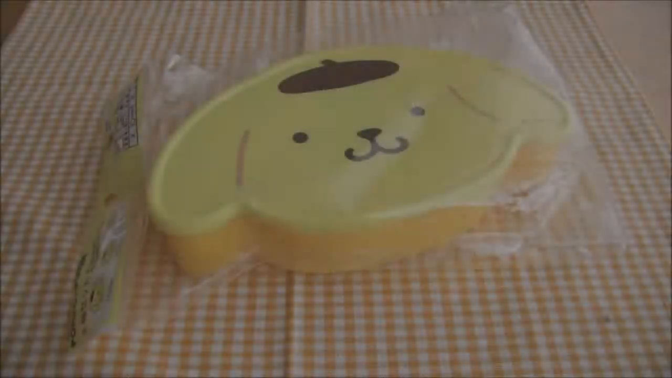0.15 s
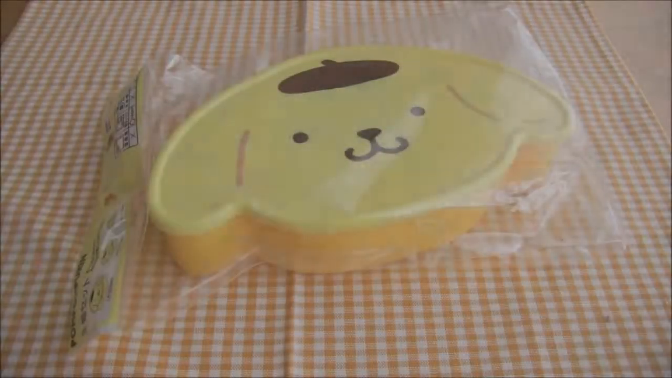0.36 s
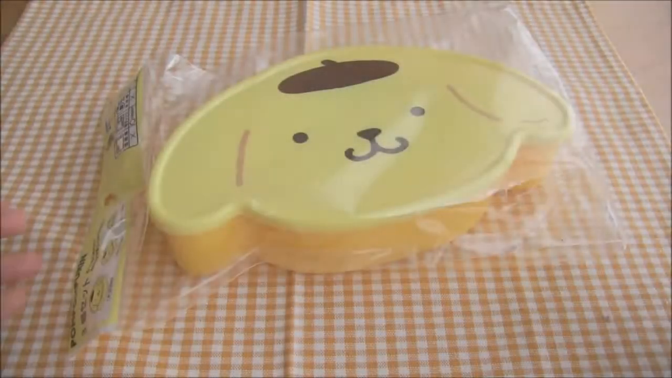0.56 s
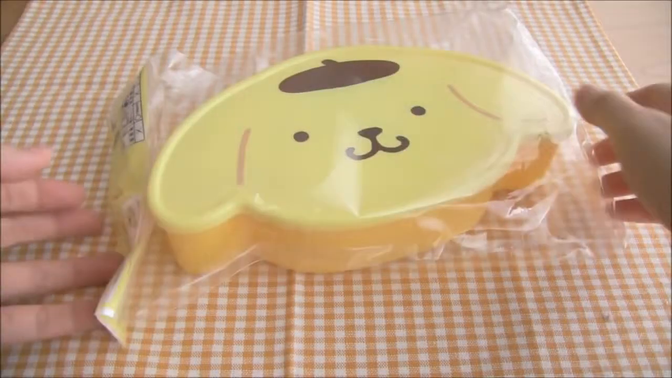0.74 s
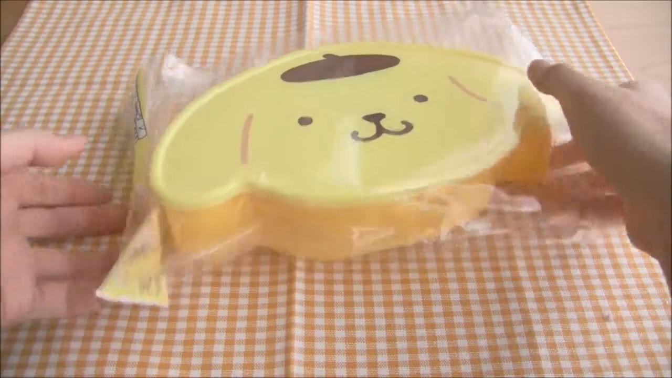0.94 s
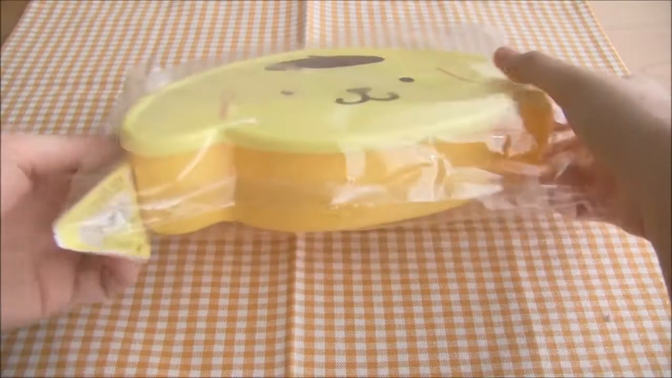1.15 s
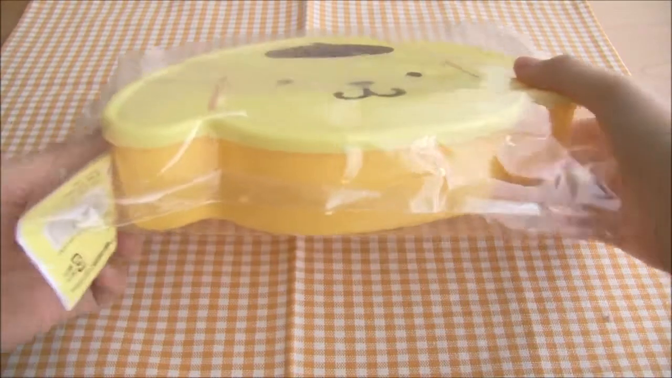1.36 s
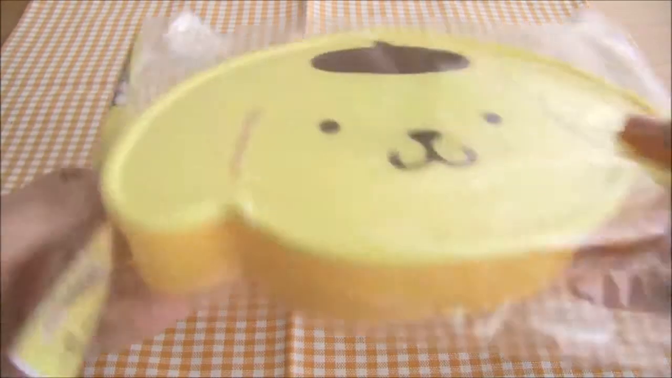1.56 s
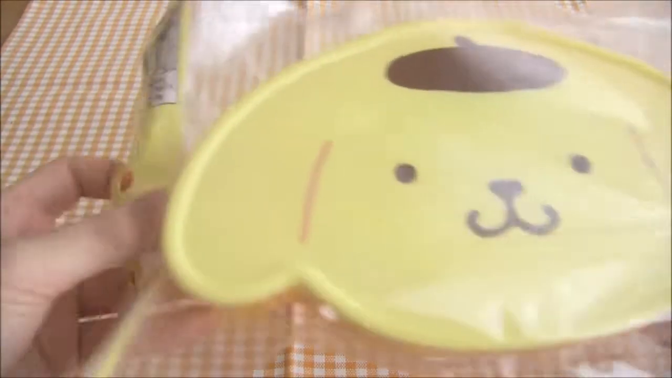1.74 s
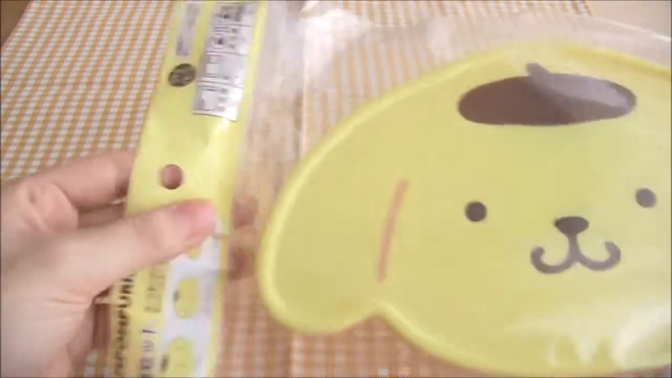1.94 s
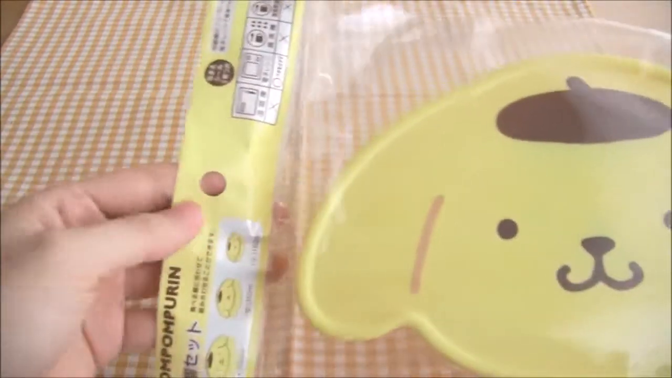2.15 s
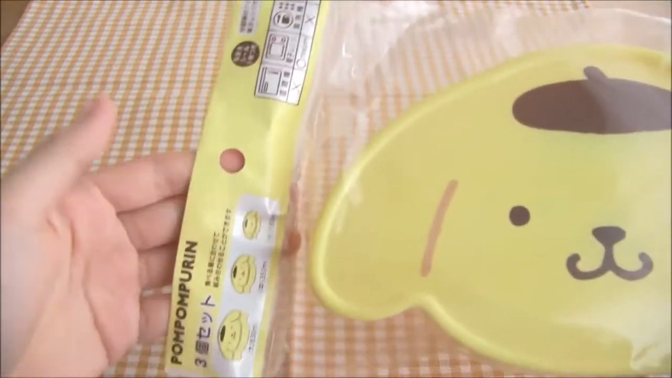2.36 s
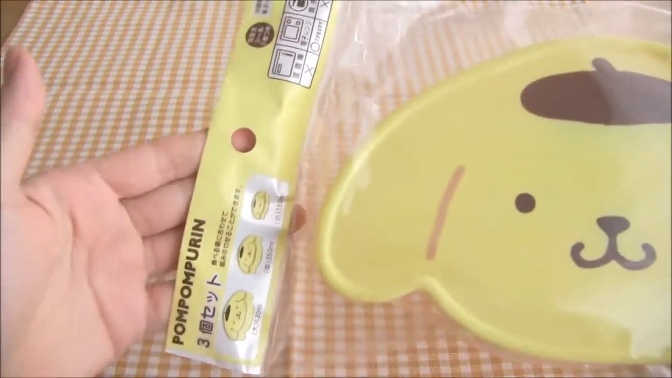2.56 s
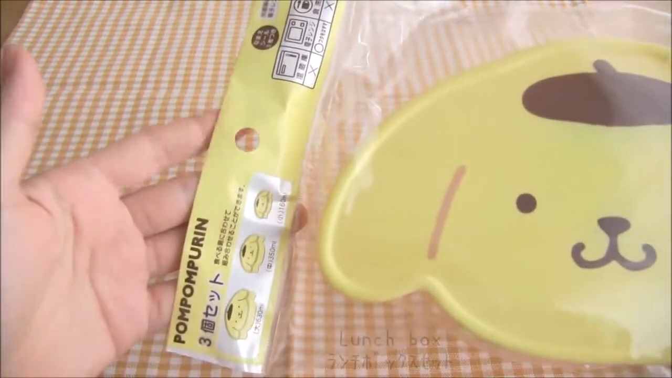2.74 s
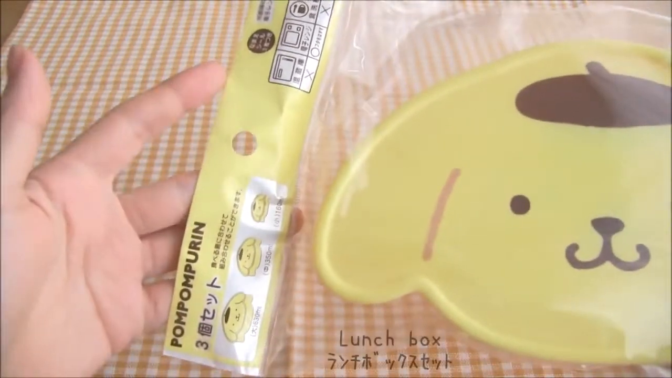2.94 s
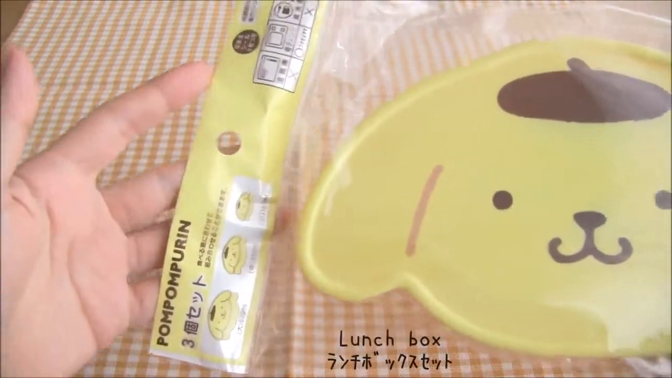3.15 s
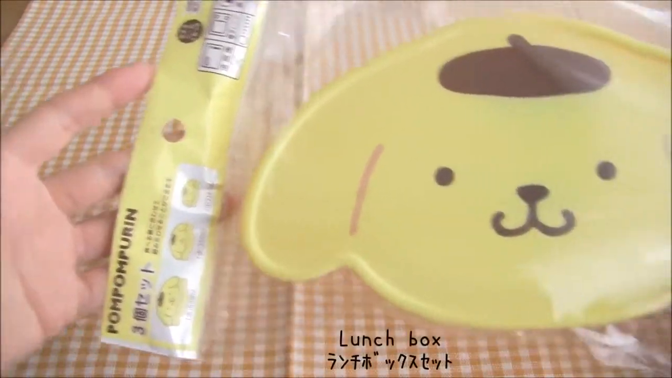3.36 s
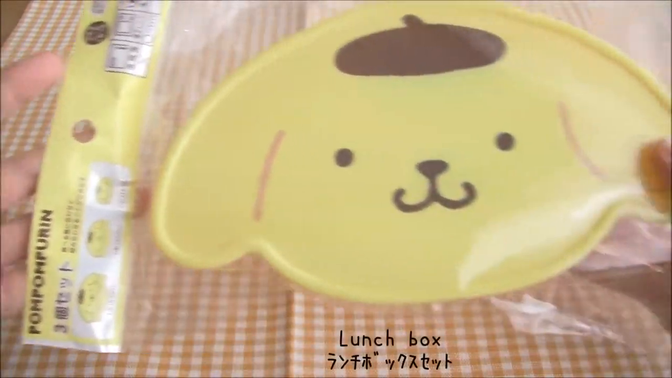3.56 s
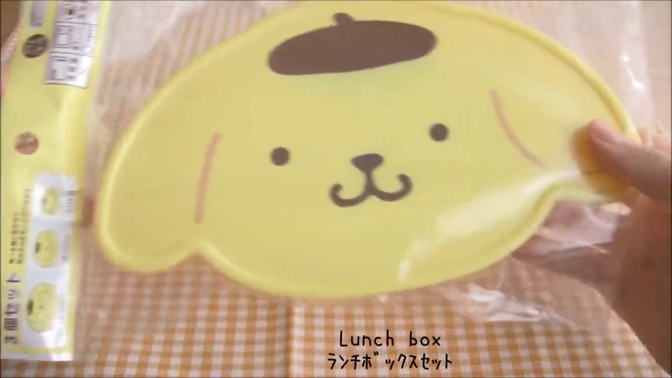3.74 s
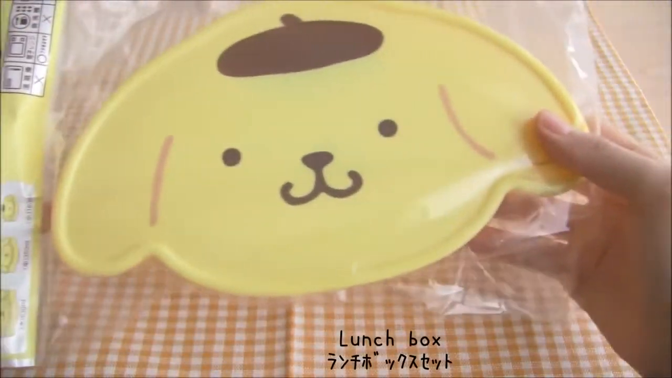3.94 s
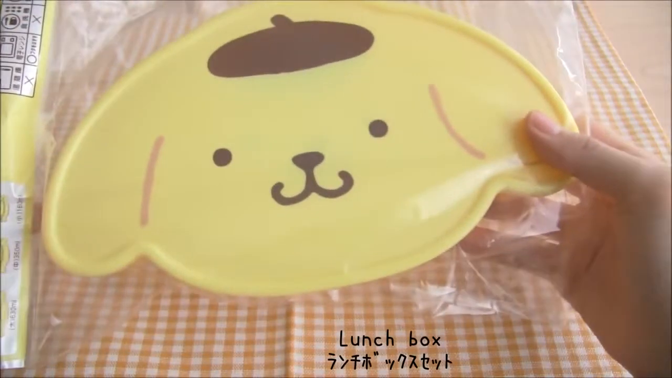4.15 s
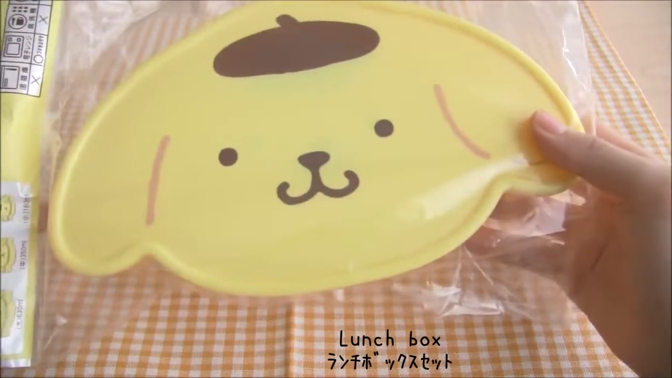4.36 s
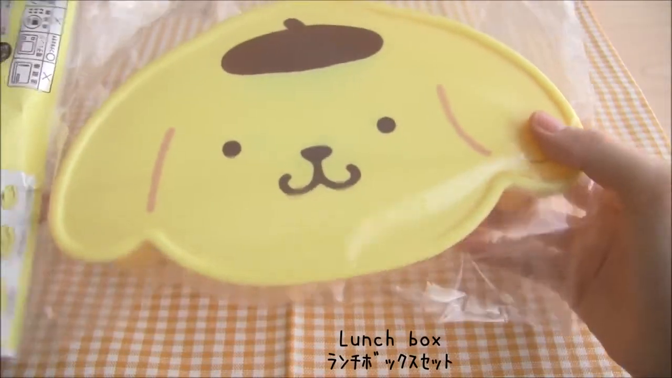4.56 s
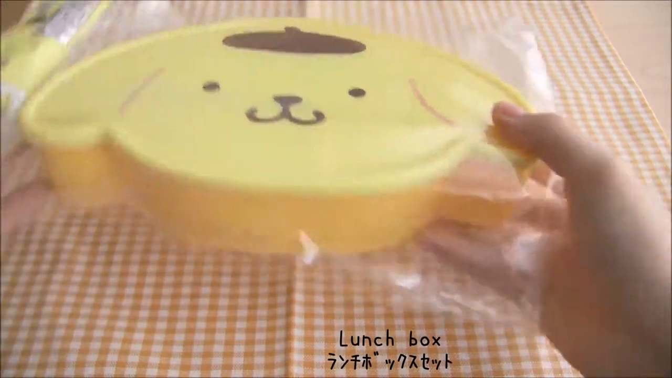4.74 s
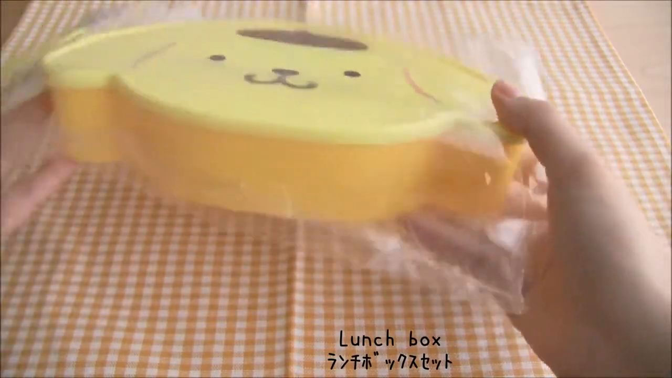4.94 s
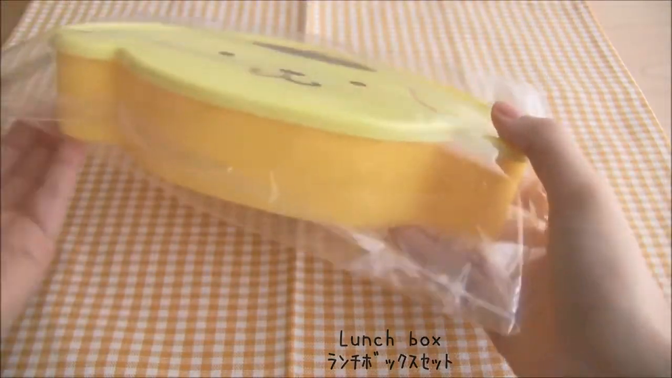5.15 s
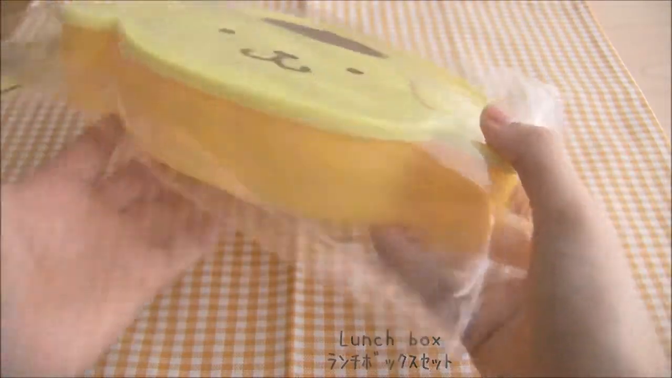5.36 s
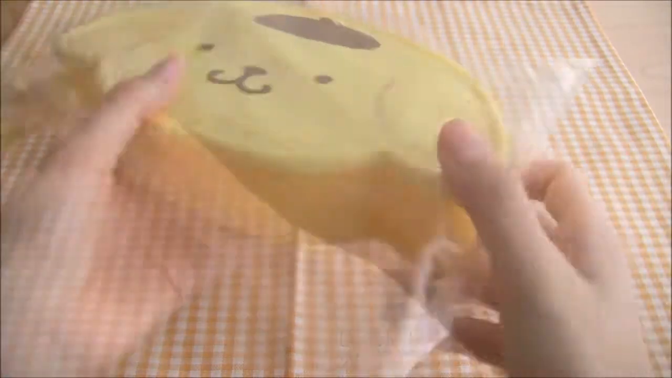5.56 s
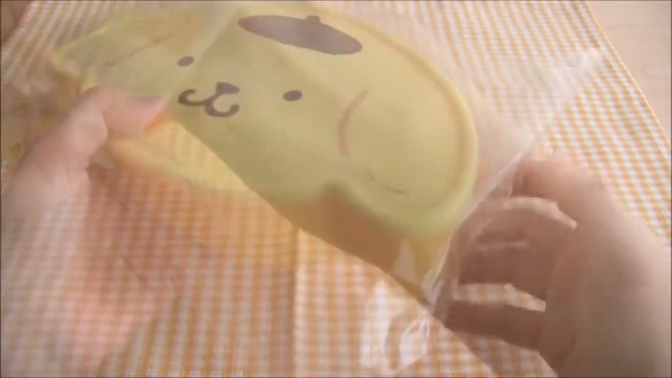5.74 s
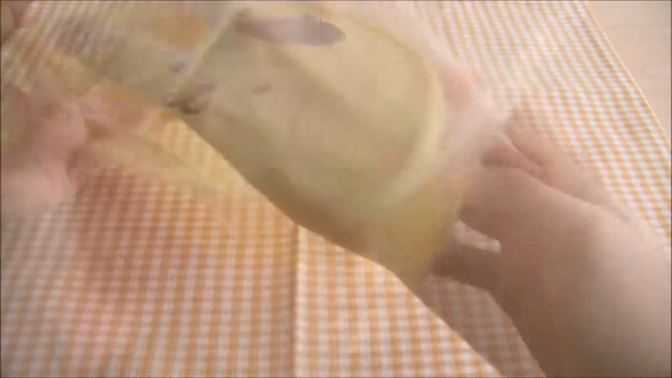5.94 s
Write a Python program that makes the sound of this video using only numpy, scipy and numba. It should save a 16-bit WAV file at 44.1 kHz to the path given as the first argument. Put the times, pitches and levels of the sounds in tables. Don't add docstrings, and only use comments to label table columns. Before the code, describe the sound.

A small quiet room is heard close up in stereo, with low house hum and soft microphone hiss underneath. Apart from one faint tick near 0.6 s, nothing happens until about 0.75 s, when hands close on a stiff clear bag holding a hollow plastic box. Crisp, bright film snaps crowd together with finer crackle as it is lifted and turned, staying busy until about 2.1 s. Dull hollow thuds come around 1.65 and 2.0 s, with strong snaps as the label strip folds. Crinkling thins and stops by 2.4 s. The hold is nearly silent, with tiny ticks near 2.65, 3.15, 3.3 and 3.8 s and a sharp click at 4.44 s. From 4.7 s the film crackles again as the box tips back, with a soft knock near 4.85 s, a lull around 5.2 s, then uneven bursts as it rolls over until 6 s. Reflections are short and shift slightly left and right.

```python
import sys
import numpy as np
from scipy import signal
from scipy.fft import rfft, irfft
from scipy.io import wavfile
from numba import njit

SR = 44100
rng = np.random.default_rng(int(sys.argv[2]) if len(sys.argv) > 2 else 0)


def boost(x):
    u = np.asarray(x, float) / 20
    return 10 ** u


def to_wav(sig):
    pcm = np.clip(np.atleast_2d(sig), -1, 1) * 32767
    pcm = np.round(pcm).astype(np.int16)
    wavfile.write(sys.argv[1], SR, pcm.T)


N = 264600

# (time [s], wide patch level
# [dB], wide patch pitch [Hz], crease level [dB], crease pitch [Hz])
STILL_TICKS = [(0.587, -39, 840, -51, 5580), (2.503, -44.5, 770, -58, 4620), (2.6364, -34, 1460, -44, 2540),
               (2.6455, -36, 1000, -33, 1600), (2.6993, -31, 890, -30.5, 6550),
               (3.1333, -35.5, 765, -39, 2190), (3.144, -34.5, 2230, -41, 4260),
               (3.187, -44, 736, -56, 6010), (3.3335, -31, 1400, -30, 2000), (3.823, -31.5, 880, -28, 2160),
               (4.4414, -16.5, 1840, -25, 6450), (4.4421, -29, 1000, -29, 3700),
               (4.648, -48, 870, -53, 5110)]


@njit
def rings(start, hz, cycles, size, rise):
    out = np.zeros((2, N + 8192))
    for k in range(len(hz)):
        turn = np.exp((2j * np.pi - np.log(1000) / cycles[k]) * hz[k] / SR)
        shrink = np.exp(-hz[k] / SR / rise)
        for ear in range(2):
            at = int(start[ear, k])
            z = size[ear, k] * turn ** (at + 1 - start[ear, k])
            gap = 1.
            for i in range(min(int(cycles[k] * SR / hz[k]), 8000)):
                gap *= shrink
                out[ear, at + 1 + i] += z.imag * (1 - gap)
                z *= turn
    return out[:, :N]


def struck(s, db, hz, cycles, spread_db=0., rise=0.23):
    # (time [s], left minus right [dB])
    hand_path = [(.7, 1), (1.1, 0), (1.6, -1.5), (2.0, 2.5), (2.3, -2.5), (3, 3), (3.8, -4), (4.5, -5.5),
                 (4.9, 4.5), (5.2, -0.5), (5.5, 1.5), (6, 3)]
    lag_s_per_db = 1.2e-6
    side_db = np.array([[.5], [-.5]]) * (np.interp(s, *np.transpose(hand_path)) + spread_db)
    pan = boost(side_db) / np.sqrt(np.mean(boost(side_db) ** 2, axis=0))
    start = np.clip((s - side_db * lag_s_per_db) * SR, 0, N - 1)
    cycles = np.maximum(cycles + 0 * s, 1)
    return rings(start, np.clip(hz, 60, SR / 2.4), cycles, boost(db) * pan, rise)


def shaped(x, hz, db):
    f = np.maximum(np.arange(x.shape[-1] // 2 + 1) * SR / x.shape[-1], 1)
    return irfft(rfft(x) * boost(np.interp(np.log(f), np.log(hz), db)), x.shape[-1])


def unit(x):
    return x / np.sqrt(np.mean(x ** 2))


def background():
    # (time [s], gain [dB])
    gain_curve = [(0, 0.5), (.7, -1), (1.5, -10.5), (2.5, -9), (3.2, -7.5), (3.6, -8.5), (4.6, -6.5),
                  (5.3, -11), (6, -4.5)]
    # (pitch [Hz], width [Hz], level [dB])
    hum_bands = [(47.3, 9, -2.5), (144, 4.8, 2), (193.4, 5.7, 1.5), (245.3, 6.2, -3), (336.2, 6.5, -5.5),
                 (305, 156, -11.5)]
    # (frequency [Hz], level per Hz [dB])
    hiss_colour = [(300, -2), (500, 1), (900, -5), (1500, -7.5), (3000, -14), (4000, -16.5), (5200, -15),
                   (6500, -22), (10000, -27.5), (14000, -27), (15500, -28), (16300, -44)]
    hum_db, hiss_db, rumble_db = -50, -54, -61.5
    t = np.arange(N) / SR
    f = np.geomspace(10, 20000, 600)
    power = 0
    for hz, width, db in hum_bands:
        resonance = boost(db) ** 2 / (1 + (2 * (f - hz) / width) ** 2)
        power = power + resonance / (1 + (f / hz / 1.06) ** 4)
    noise = rng.standard_normal((6, N))
    hum = shaped(noise[0] + 0.53 * noise[1:3], f, 10 * np.log10(power / (1 + (70 / f) ** 4)))
    alike = shaped(noise[3], [1500, 8000], [-8, 3])
    hiss = shaped(alike + noise[4:], *np.transpose(hiss_colour))
    rumble = shaped(noise[0] + 0.19 * noise[4:], [15, 35, 88, 220], [-4, 18.5, 0.5, -45])
    gain = boost(np.interp(t, *np.transpose(gain_curve)))
    steady = unit(hum) * boost(hum_db) + unit(hiss) * boost(hiss_db)
    return unit(rumble) * boost(rumble_db) + gain * steady


def room(dry):
    # (frequency [Hz], level [dB])
    tail_colour = [(200, 5.5), (600, -2), (1300, 2), (2000, 7), (3200, 10.5), (6000, 7), (12000, 7)]
    tail_t60 = [0.56, 0.73, 0.39, 0.37, 0.22, 0.31, 0.22]
    # (delay [s], level [dB])
    flat_echoes = [
        (.0075, -16),
        (0.0169, -21.5),
        (0.0236, -26),
    ]
    room_db, table_db = -8.5, -23
    wall_s, table_s = .0073, .0011
    t = np.arange(SR // 2) / SR
    centres = np.array(tail_colour)[:, 0]
    noise = rng.standard_normal((3, len(t)))
    noise = noise[0] + 0.24 * noise[1:]
    chance = rng.random(len(t) // 24 + 1).repeat(24)[:len(t)]
    noise *= np.where(chance < .2 + t / .05, 1, .3)
    octave = np.log2(np.arange(1, len(t) // 2 + 2) * SR / len(t))
    spectrum = rfft(noise)
    tail = 0
    for (hz, db), t60 in zip(tail_colour, tail_t60):
        band = irfft(spectrum * np.interp(octave, np.log2(centres), centres == hz), len(t))
        tail = tail + boost(db - 60 * t / t60) * band
    tail = tail * np.clip((t - wall_s) / 0.00049, .08, 1)
    tail *= 1 + .9 * np.exp(-t / .018) * (t > wall_s)
    tail *= boost(room_db) / np.sqrt(np.sum(tail ** 2) / 2)
    tail[:, 0] = 1
    tail[:, int(table_s * SR)] += boost(table_db)
    for late, db in flat_echoes:
        tail[:, int(late * SR)] += boost(db)
    return signal.fftconvolve(dry, tail, axes=1)[:, :N]


def box():
    # (time [s], peak level
    # [dB], pitch [Hz])
    box_thuds = [(0.77, -30, 151), (1.299, -34.5, 197), (1.652, -18.5, 390), (1.98, -21.5, 355),
                 (2.047, -18.5, 314), (2.22, -48, 380), (2.332, -39, 295), (3.3338, -34.5, 720),
                 (3.8242, -29, 1630), (3.825, -39, 490), (4.443, -35, 326), (4.782, -25.5, 296),
                 (4.857, -20, 398), (5.411, -35, 402), (5.707, -36, 154), (5.721, -39, 68),
                 (5.874, -35.5, 180), (5.88, -39, 75.5)]
    s, db, hz = np.transpose(box_thuds)
    shell = struck(s, db, hz, 6.)
    air = struck(s, db - 17.0, .4 * hz, 3.)
    return shell + air


def squeeze(s):
    # (time [s], level [dB], hold [s], crease share [dB])
    film_squeezes = [(0.79, -31, 0.013, 2), (0.943, -32, 0.079, 0.5), (1.075, -27.5, 0.081, 2),
                     (1.26, -30, 0.034, 3), (1.352, -29, 0.13, -2.5), (1.552, -29.5, 0.019, -4),
                     (1.677, -28.5, 0.091, -5), (1.818, -41, 0.047, 20.5), (1.924, -28.5, 0.02, -2.5),
                     (2.035, -24.5, 0.013, -1), (2.233, -31.5, 0.041, -5), (2.332, -35.5, 0.019, -2),
                     (4.714, -35.5, 0.011, -6), (4.776, -30.5, 0.016, 0), (4.919, -31, 0.026, 0),
                     (5.078, -32.5, 0.057, 0), (5.304, -37, .03, -3), (5.386, -25, 0.012, -7),
                     (5.596, -32, 0.065, -9), (5.663, -30, 0.089, -4), (5.837, -26, 0.025, -11)]
    grip_db_per_s, relax_db_per_s = 358, 228
    at, db, hold, crease_db = np.transpose(film_squeezes)[:, :, None]
    grip = grip_db_per_s * np.maximum(at - s, 0)
    relax = relax_db_per_s * np.maximum(s - at - hold, 0)
    power = boost(db - grip - relax) ** 2
    total = power.sum(0)
    return 10 * np.log10(total), (power * crease_db).sum(0) / total


def swarm():
    # (start [s], end [s])
    busy_spans = [
        (.7, 2.45),
        (4.65, 6),
    ]
    creases_per_s = 1000
    out = 0
    for begin, end in busy_spans:
        count = int(creases_per_s * (end - begin))
        u = rng.random((count, 2)).T
        c = rng.standard_normal((count, 5)).T
        s = begin + u[0] * (end - begin)
        db, crease_db = squeeze(s)
        size_db = -3.8 * np.log(u[1] + .05)
        db = db + size_db - 14.0
        edge_hz = 10500 * boost(2.4 * c[4])
        out = out + struck(s, db, 1300 * boost(5.13 * c[1]), 13.6, 3.9 * c[0])
        out = out + struck(s, db + crease_db + 2.0 * c[3], 4200 * boost(3.53 * c[2]), 25.3, 29.0 * c[0])
        out = out + struck(s, db + crease_db - 4.5, edge_hz, 26.0, 1.8 * c[0])
    return out


def aftershocks(s, wide_db, wide_hz, crease_db, crease_hz):
    u = rng.random((len(s), 10)).T
    c = rng.standard_normal((len(s), 4, 10)).T
    late = .0012 - .006 * np.log(u + .01)
    db = -19.0 - 500 * late + 3.5 * np.tanh(c[:, 0])
    at = (s + late).ravel()
    spread_db = 7.7 * c[:, 1].ravel()
    patch_hz = wide_hz * boost(4.87 * np.tanh(c[:, 2]))
    fold_hz = crease_hz * boost(4.27 * np.tanh(c[:, 3]))
    patches = struck(at, (wide_db + db).ravel(), patch_hz.ravel(), 18.4, spread_db)
    return patches + struck(at, (crease_db + db).ravel(), fold_hz.ravel(), 23.0, spread_db)


def every_snap():
    # (time [s], wide patch level [dB], wide patch pitch [Hz], crease level [dB], crease pitch [Hz])
    lift_snaps = [(0.7549, -34, 1550.0, -45, 3040.0), (0.77, -24, 1940.0, -34.0, 3970),
                  (0.7734, -19, 2100, -19.5, 5400), (0.7902, -12, 1750, -17.5, 4720),
                  (0.7994, -25, 1730, -32, 4600), (0.814, -20, 1770, -38, 2910.0),
                  (0.819, -20, 2000, -25, 3300), (0.8605, -23.5, 2270, -12, 3850.0),
                  (0.8674, -36, 2540, -21, 6070), (0.8713, -30.0, 2630.0, -20, 4800),
                  (0.9044, -27.5, 1660, -28, 3270), (0.9279, -26, 2700, -35, 9000),
                  (0.9448, -23, 1630, -29, 3180), (0.9868, -28.5, 1300, -18, 3000),
                  (0.9542, -21, 2780, -22, 4160), (0.9674, -12, 1930, -14, 3170),
                  (1.0049, -34, 1120.0, -32, 4100), (1.0316, -24.5, 1450, -25, 3880.0),
                  (1.021, -34, 1900, -22, 3280), (1.0602, -22, 2780, -18.5, 3600),
                  (1.0759, -15.5, 2650, -13, 3500), (1.0838, -22, 2640, -31, 3750.0),
                  (1.0949, -27, 2450, -21.5, 4560), (1.1036, -33, 1100, -23, 6800),
                  (1.1075, -32, 2300.0, -18, 3170), (1.1193, -15.5, 1580, -19.5, 6800),
                  (1.1397, -16, 1660, -27, 4500), (1.1481, -20, 1500, -9.5, 3650),
                  (1.1581, -29, 2650.0, -27, 4200), (1.1688, -21, 2720, -34, 3060.0),
                  (1.1726, -16, 1130, -10, 2180), (1.1952, -15, 2400, -12, 7100),
                  (1.2022, -21, 860.0, -10, 3400), (1.2119, -23, 2880, -36, 6850),
                  (1.2189, -34, 2950, -35, 4100.0)]
    raise_snaps = [(1.236, -26, 2200, -20, 3600), (1.2419, -16, 2420, -17, 5510.0),
                   (1.2492, -29, 865, -18, 3180), (1.259, -23.5, 1560.0, -19, 5200),
                   (1.276, -25, 2200.0, -17.5, 6600), (1.2844, -26, 1180, -18.5, 4400),
                   (1.2863, -19.5, 1340, -21.5, 4230), (1.307, -25, 1130, -25, 3070),
                   (1.3403, -31, 846, -28.5, 3140), (1.3565, -16.5, 2100, -17.5, 3370),
                   (1.3624, -23, 980, -19, 2200), (1.377, -25, 940, -29, 4800),
                   (1.4225, -22, 880, -30, 2900), (1.4129, -39, 1140.0, -22, 2920),
                   (1.4195, -39, 1650, -15, 2900), (1.4477, -32, 2700.0, -29, 4080),
                   (1.461, -30, 960, -38, 4740.0), (1.472, -26, 980, -39, 3700.0),
                   (1.492, -20.5, 1730, -26, 3700), (1.5, -17.5, 935, -8, 3020),
                   (1.5252, -19.5, 2120, -37, 2940.0), (1.534, -28, 2660, -43, 3730),
                   (1.552, -20, 1780, -22.5, 2940), (1.5579, -23, 1170.0, -28, 2960.0),
                   (1.57, -16.5, 1910, -32, 3480), (1.5736, -20, 2150, -29, 3800),
                   (1.58, -24, 2000, -46, 4630.0), (1.608, -38, 2240.0, -22, 3570),
                   (1.6223, -28, 930, -37, 3410.0), (1.6336, -21, 2200.0, -22.5, 3880)]
    turn_snaps = [(1.6425, -27, 1570.0, -35, 3640.0), (1.646, -26, 2280.0, -41, 3360.0),
                  (1.6511, -17.5, 1160, -13.5, 3160), (1.6533, -31, 800, -18, 3140),
                  (1.6635, -34, 1420.0, -23, 3280), (1.6749, -26, 1300, -22, 3700),
                  (1.688, -19, 1280, -19, 2830), (1.6946, -22.5, 940, -20, 3320),
                  (1.6958, -29, 1370, -36, 3250), (1.704, -25, 900, -15.5, 3650),
                  (1.7245, -16.5, 1290, -8.5, 3150), (1.7417, -41, 2450.0, -36, 3110.0),
                  (1.749, -21, 2110, -37, 3620.0), (1.761, -25.5, 980, -20.5, 4730),
                  (1.766, -13, 2420, -14.5, 3080.0), (1.7763, -33.5, 1530.0, -32, 3020),
                  (1.7947, -23, 2100.0, -31, 3200), (1.8123, -25, 1000, -22, 2690),
                  (1.819, -21, 800, -26, 2880), (1.8224, -18, 2520, -17, 3220),
                  (1.841, -17.5, 1350, -23, 2880), (1.8532, -15.5, 824, -9, 1750),
                  (1.8864, -23, 2370.0, -28, 4400), (1.9149, -16, 1780, -13.5, 3400),
                  (1.9166, -22.5, 780, -16, 7500), (1.9227, -21, 2800, -17, 6000),
                  (1.9315, -17, 1910.0, -21, 3830.0), (1.9384, -13, 1540, -17, 3900),
                  (1.968, -39, 1860.0, -28, 3550.0), (1.9764, -13.5, 2180, -8, 4230),
                  (1.9779, -23, 637, -17, 3730), (1.9934, -32, 1240.0, -24, 4700),
                  (2.023, -18, 2920, -9, 5640), (2.0255, -42, 1730.0, -23, 6200.0)]
    fold_snaps = [(2.0306, -32, 2660.0, -30, 4960.0), (2.0426, -25, 1830.0, -19, 7600),
                  (2.0462, -14, 1300, -22, 6200), (2.0535, -12, 1390, -23, 3900),
                  (2.0555, -23, 1410, -27, 3260), (2.0621, -12, 2220, -25, 3140),
                  (2.074, -22, 2200.0, -14.5, 5580), (2.0928, -30, 814, -37, 5640.0),
                  (2.102, -29, 1370, -31, 3750), (2.1083, -27, 2090.0, -30.0, 4960),
                  (2.1558, -31.5, 2150, -27.5, 4880.0), (2.1903, -34, 1070, -36, 4060),
                  (2.2025, -34, 775, -46, 4200.0), (2.217, -26, 2450.0, -21, 4500),
                  (2.2194, -18.5, 1080, -16.5, 6270), (2.2273, -17.5, 2170.0, -18.5, 3940),
                  (2.27, -42, 2610.0, -29, 3830.0), (2.2875, -28.5, 2190, -31, 4320),
                  (2.3023, -25, 2360, -23, 4700), (2.328, -27, 2500, -17, 9400),
                  (2.3317, -18.5, 1740, -16, 4670), (2.3347, -23.5, 1980, -19, 5300),
                  (2.3507, -44, 2500, -27, 5460), (2.3642, -27.5, 1340, -29, 4740)]
    tip_snaps = [(4.7111, -31, 1670, -44, 3070.0), (4.7163, -31, 1600, -48, 3210.0),
                 (4.736, -29, 2430, -46, 3420.0), (4.7619, -20.5, 2460, -19.5, 3600),
                 (4.7727, -17.5, 1570, -19, 3830), (4.7816, -18, 1700, -15.5, 3800),
                 (4.79, -45, 2220.0, -32, 3900.0), (4.7912, -27, 2530.0, -28, 4060),
                 (4.797, -20, 1310, -17, 2900), (4.821, -36, 1000, -26, 3290.0),
                 (4.8312, -20, 1720, -44, 3080.0), (4.8458, -35, 1720, -43, 4290.0),
                 (4.8561, -18.5, 2540, -22, 4230), (4.8749, -27, 654, -26, 2960),
                 (4.891, -15, 2160, -10.5, 5500), (4.8935, -30, 730, -35, 5570.0),
                 (4.9, -36, 2110.0, -29, 5760.0), (4.908, -27.5, 1170, -22, 3400),
                 (4.9289, -34, 1010.0, -31, 5850), (4.9354, -26.5, 1400, -23, 5500),
                 (4.9815, -33, 2950, -38, 4780), (4.9905, -22.0, 2850.0, -43, 3910.0),
                 (5.0006, -34, 2180, -25.0, 3370), (5.0097, -41, 2840, -37, 3320.0),
                 (5.0337, -27, 2290.0, -21.5, 5170), (5.0366, -21.5, 2930, -27, 3560),
                 (5.0711, -29.5, 965, -10, 3070), (5.082, -27, 2670, -19.5, 3900),
                 (5.1101, -23, 1580, -18, 2940), (5.1138, -30, 2680, -19, 3300),
                 (5.1168, -37, 1770, -20.5, 7200), (5.1228, -32, 2000, -30, 3580),
                 (5.1357, -22.5, 2580, -30, 3000), (5.171, -33, 1390, -48, 4450.0),
                 (5.2585, -38, 2530, -52, 3400), (5.2776, -41, 1060, -31.5, 3200)]
    roll_snaps = [(5.31, -25.5, 1830, -35, 4930.0), (5.3254, -28, 2220.0, -44, 4510.0),
                  (5.3296, -31.5, 784, -42.5, 5720.0), (5.338, -26, 2180, -31, 5500),
                  (5.3487, -15.5, 1440, -19, 2920), (5.3641, -34.0, 1710.0, -19.5, 3260),
                  (5.379, -19, 3000, -19, 5500), (5.3841, -29, 2860, -7, 4720),
                  (5.4102, -23, 1000, -22, 4520), (5.414, -29, 1250, -9.5, 3020),
                  (5.4655, -25, 1520, -30, 4620), (5.5412, -32, 1790, -37, 3950),
                  (5.5634, -19, 2140, -27, 8600), (5.59, -31, 1190, -24.5, 3300),
                  (5.6145, -32, 724, -26, 1800), (5.6203, -44, 890.0, -26, 3170.0),
                  (5.6327, -32, 846, -24, 5700), (5.6657, -20.5, 1440, -17.5, 4700),
                  (5.689, -22.5, 1170, -23, 3460.0), (5.692, -27, 1200, -28, 3760.0),
                  (5.6972, -25.5, 2230.0, -22, 3600), (5.7071, -23, 1830, -32, 3550.0),
                  (5.7153, -29, 1200, -29, 2700), (5.7269, -20, 2470.0, -18, 5700),
                  (5.7304, -21.5, 1570, -20.5, 7400), (5.7342, -28, 2850, -18.5, 3830),
                  (5.7388, -22, 2010.0, -26, 5300.0), (5.7564, -29, 2290.0, -23, 4900),
                  (5.7632, -31, 920.0, -25, 3820.0), (5.7923, -22, 1250, -15, 2300),
                  (5.7983, -14, 1130, -10.5, 2900), (5.8293, -26, 2070, -25, 3230),
                  (5.837, -22, 2300, -32, 3350), (5.8572, -26.5, 920, -29, 2500),
                  (5.8714, -13, 1700, -16, 4700), (5.93, -32.5, 910, -24, 3830),
                  (5.8683, -21, 980, -22, 4630)]
    close_snaps = [
        (2.0495, -14.5, 1160, -8.5, 3230),
        (4.8861, -33, 1110, -21, 8000),
        (5.064, -32, 2120, -38, 3080),
        (5.8082, -27, 1160, -21, 2300),
    ]
    moving = [lift_snaps, raise_snaps, turn_snaps, fold_snaps, tip_snaps, roll_snaps, close_snaps]
    return np.vstack(moving + [STILL_TICKS]).T


def snaps(s, wide_db, wide_hz, crease_db, crease_hz):
    c = rng.standard_normal((len(s), 3)).T
    wide_cycles = 8.6 * (wide_hz / 1800) ** -0.25 * boost(c[0])
    crease_cycles = crease_hz / 230 * boost(np.tanh(c[1]))
    lead = struck(s, wide_db + 0.16, wide_hz, wide_cycles, 5.3 * c[2])
    lead += struck(s, crease_db - 2.0, crease_hz, crease_cycles, 10.0 * c[2], rise=0.65)
    u = rng.random((len(s), 3, 18)).T
    hz = 450 * 2 ** ((np.arange(18)[:, None] + u[:, 0]) / 3.5)
    between = np.clip(np.log(hz / wide_hz) / np.log(crease_hz / wide_hz), 0, 1)
    db = wide_db + between * (crease_db - 1.5 - wide_db) - 7.5 + 5.3 * (u[:, 1] - .5)
    db -= 2.76 * np.maximum(np.log2(wide_hz / hz), 0)
    treble_db_per_octave = 7.0 - 0.31 * (crease_db + 17.5)
    db -= treble_db_per_octave * np.maximum(np.log2(hz / crease_hz), 0)
    for lead_hz in (wide_hz, crease_hz):
        db -= 8.6 * np.exp(-(np.log2(hz / lead_hz) / 0.21) ** 2)
    late = -.0006 * np.log(u[:, 2] + 0.0225)
    spread_db = 8.2 * c[2] + 28.0 * (u[:, 1] * 7 % 1 - .5)
    cycles = 7.3 * hz / 2000
    crowd = struck((s + late).ravel(), db.ravel(), hz.ravel(), cycles.ravel(), spread_db.ravel())
    return lead, crowd


def scene():
    events = every_snap()
    lead, crowd = snaps(*events)
    wall_share = .6
    thin = signal.butter(2, 260, "highpass", fs=SR, output="sos")
    near = signal.sosfilt(thin, (1 - wall_share) * lead)
    moving = events[:, :-len(STILL_TICKS)]
    film = wall_share * lead + crowd + aftershocks(*moving) + swarm()
    return near + room(signal.sosfilt(thin, film) + box()) + background()


def top_cut(x):
    return signal.sosfilt(signal.butter(12, 16820, fs=SR, output="sos"), x)


def record(dry):
    x = shaped(dry, [30, 120, 9000, 15000, 16500], [-25.0, 0.0, 6.0, 2.5, -14])
    rounded = np.tanh(1.5 * x) / 1.5
    mix = shaped(rounded, [16500, 16800], [0, -80])
    return top_cut(mix)


dry = scene()
out = record(dry)
to_wav(out)
```